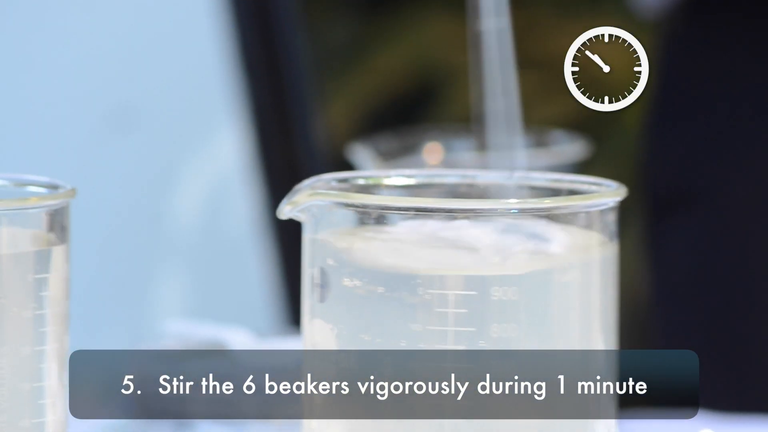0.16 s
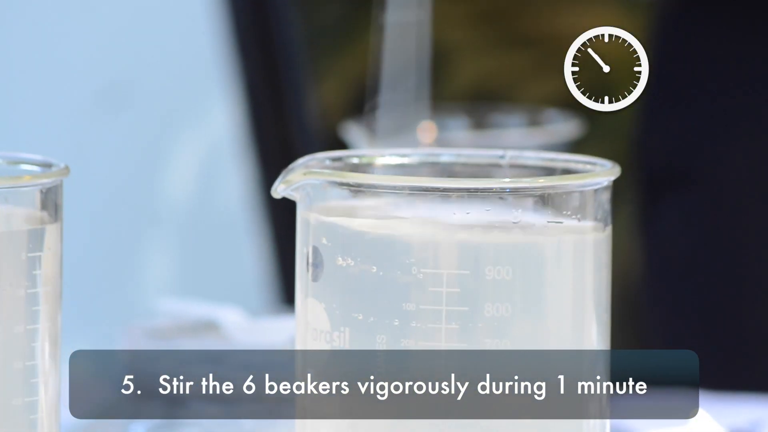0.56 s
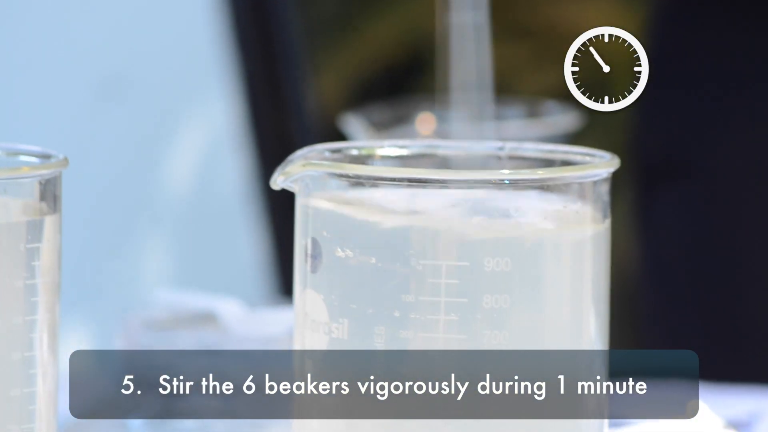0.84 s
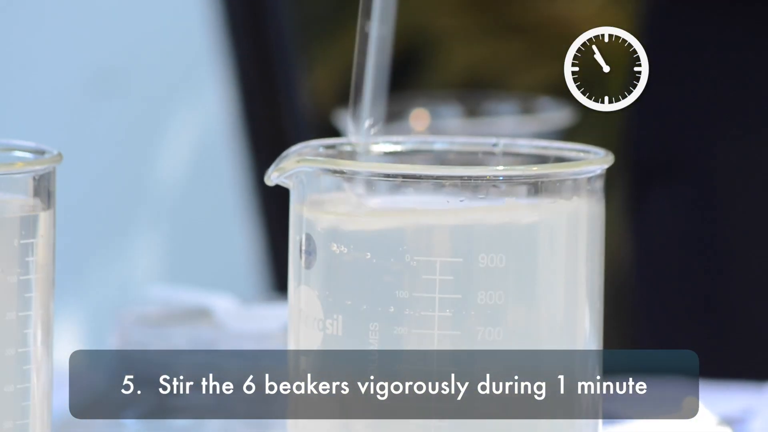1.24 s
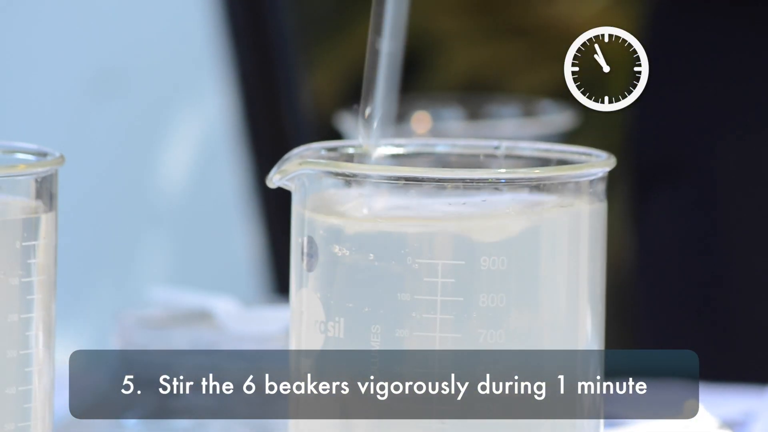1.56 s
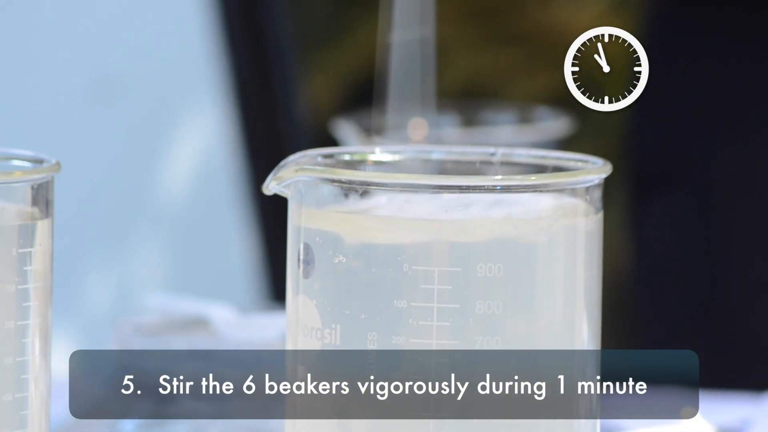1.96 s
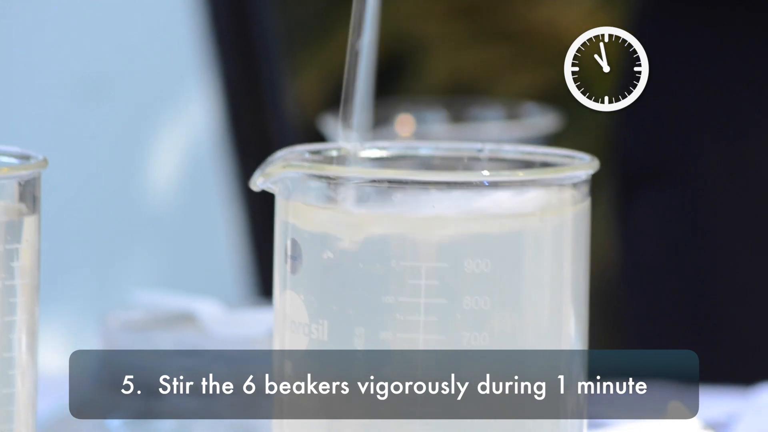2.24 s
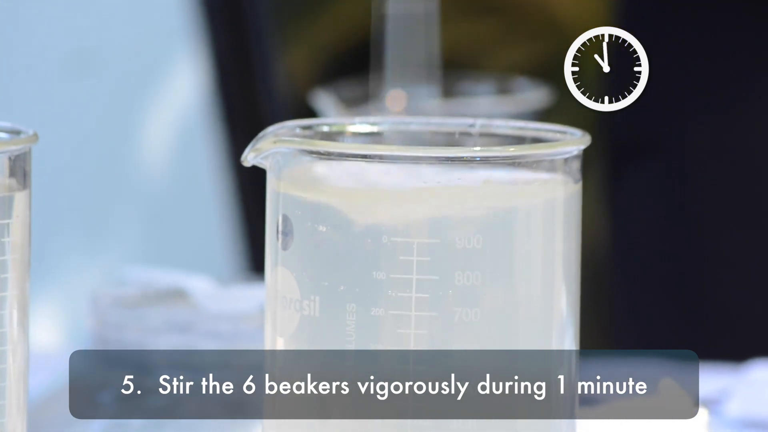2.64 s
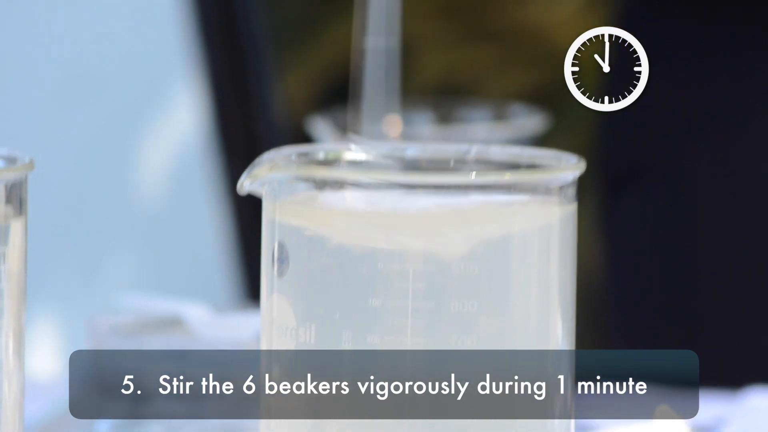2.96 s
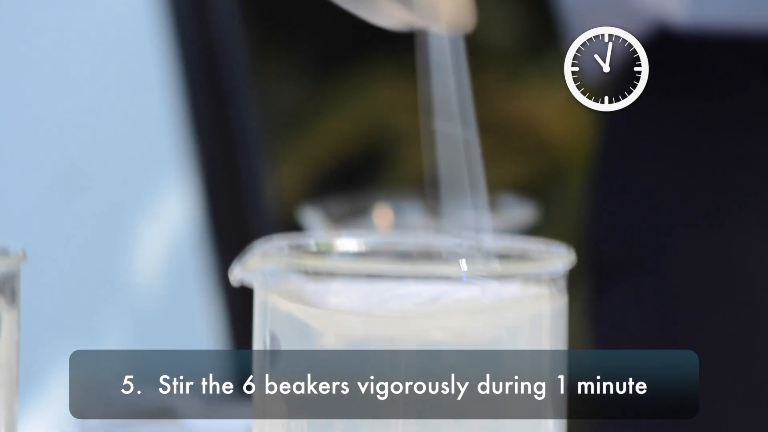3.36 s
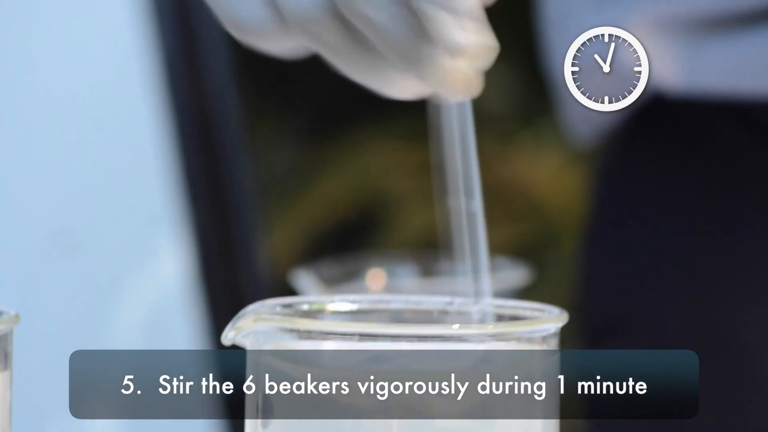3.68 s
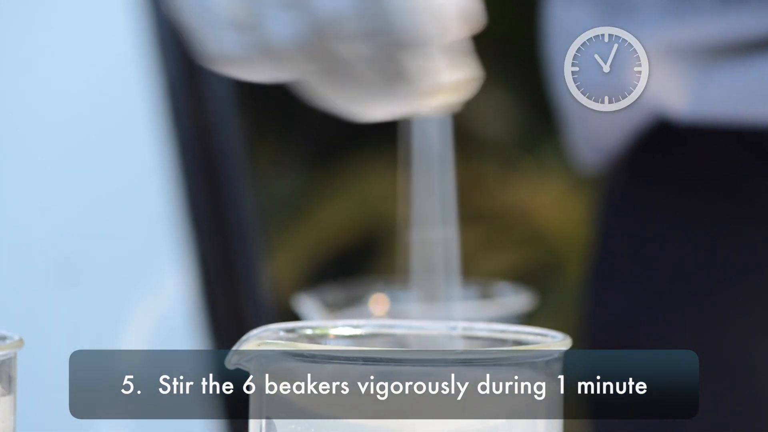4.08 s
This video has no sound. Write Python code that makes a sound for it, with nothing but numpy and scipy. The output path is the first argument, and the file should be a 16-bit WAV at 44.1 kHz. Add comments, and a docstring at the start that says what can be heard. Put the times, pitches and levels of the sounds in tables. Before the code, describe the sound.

Close, bright glass taps with quick bounces and small bubble plips, over echoing birdsong and a soft outdoor wash.

```python
"""A glass rod swings in a water-filled beaker outdoors: noisy cracks and ringing modes as it strikes and bounces.
The beaker wall sings on as a wavering tone, and bubbles pop as damped, rising tones.
Songbirds whistle gliding sine notes that echo among trees and walls.
A filtered-noise outdoor wash lies behind; a faint breeze makes low noise lumps and thuds on the microphones."""
import sys
import numpy as np
from scipy import signal
from scipy.fft import rfft, irfft
from scipy.io import wavfile
from scipy.ndimage import uniform_filter1d

SR = 44100
rng = np.random.default_rng(int(sys.argv[2]) if len(sys.argv) > 2 else 0)


def invert_db(x):
    """Field ratio 10**(x/20) for x, a level in decibels (scalar or array-like)."""
    u = np.asarray(x, float) / 20
    return 10 ** u


def dump(signal):
    """Clip the signal to [-1, 1] and save it as 16-bit WAV at the path in sys.argv[1]."""
    limited = np.clip(np.atleast_2d(signal).T, -1, 1)
    pcm = np.round(limited * 32767).astype(np.int16)
    wavfile.write(sys.argv[1], SR, pcm)


N = 185793  # samples in the scene


def evened(x):
    """Scales x to rms 1."""
    return x / np.sqrt(np.mean(x ** 2) + 1e-20)


def read(points, hz):
    """Reads a table on a log-frequency axis."""
    f, value = np.transpose(points)
    return np.interp(np.log(hz + 1), np.log(f + 1), value)


def add(mix, s, sound):
    """Mixes a sound in at s seconds."""
    part = mix[round(s * SR):][:len(sound)]
    part += sound[:len(part)]


def coloured(x, db_at):
    """Filters x by a gain in dB that depends on frequency."""
    gain = invert_db(db_at(np.fft.rfftfreq(x.shape[-1], 1 / SR)))
    return irfft(rfft(x) * gain, x.shape[-1])


def swells(rows, rest_db):
    """A resting level with smooth rises and falls laid over it."""
    t = np.arange(N) / SR
    level = invert_db(rest_db)
    for s, length, db in rows:
        level = level + invert_db(db) * np.sin(np.pi * np.clip((t - s) / length, 0, 1))
    return level


def echo(x, decay, first_s, same):
    """Dense two-channel scatter that fades in after first_s, each band dying at its own speed."""
    taps = rng.standard_normal((2, SR))
    taps[1] = same * taps[0] + np.sqrt(1 - same ** 2) * taps[1]  # same: left-right likeness
    hz, t, z = signal.stft(taps, SR, nperseg=256)
    z = z * invert_db(-60 * t / read(decay, hz)[:, None])
    tail = signal.istft(z, SR, nperseg=256)[1][:, :SR]
    tail *= np.clip(np.arange(SR) / SR / first_s - 1, 0, 1)
    tail /= np.linalg.norm(tail[0])
    return signal.fftconvolve(x[None], tail, axes=1)[:, :N]


def whistle(t, glide, level, waver=0.006, flutter_db=2.0):
    """A near-pure tone on the pitch curve glide, trembling slightly in pitch and strength."""
    tremble, flutter = (evened(uniform_filter1d(row, 300)) for row in rng.standard_normal((2, len(t))))
    glide = uniform_filter1d(glide, 150, mode="nearest") * (1 + waver * tremble)
    tone = np.sin(2 * np.pi * np.cumsum(glide) / SR)
    return t[0], np.sqrt(2) * level * invert_db(flutter_db * flutter) * tone


def note(start, length, db, first_hz, halfway_hz, last_hz):
    """A short whistle: pitch on a parabola through three points; the level rises, holds and falls."""
    rise, fall = 0.16, 0.34  # shares of the note
    t = np.arange(start, start + length, 1 / SR)
    u = (t - start) / length
    bend = 2 * (2 * halfway_hz - first_hz - last_hz) * u * (1 - u)
    glide = first_hz + (last_hz - first_hz) * u + bend
    edges = np.clip(np.minimum(u / rise, (1 - u) / fall), 0, 1)
    return whistle(t, glide, invert_db(db) * edges)


def wall_hum():
    """The beaker wall sings on in the swirl: a narrow tone whose strength wavers."""
    # swells of the singing: (start t/s, length/s, level/dB before the waver)
    singing = [(0, 0.36, -60), (1.0, 0.5, -60.5), (1.46, 0.37, -48.5), (1.93, 0.17, -46), (2.1, 0.28, -56),
               (2.92, .3, -51.5), (3.58, 0.093, -39)]
    sing_hz, width_hz, steady, rest_db = 1295, 14, 1.0, -63
    t, r = np.arange(N) / SR, np.exp(-np.pi * width_hz / SR)
    noise = rng.standard_normal(N) + 1j * rng.standard_normal(N)
    waver = signal.lfilter([1], [1, -r], noise)
    waver = steady + waver / np.sqrt(np.mean(abs(waver) ** 2))
    return swells(singing, rest_db) * (waver * np.exp(2j * np.pi * sing_hz * t)).real


def air():
    """The distant wash and its faint far tones: random short-time spectra with drifting patches."""
    # colour of the wash: (f/Hz, relative level/dB per Hz)
    wash = [(20, -26), (40, -10), (62, -11), (90, -8), (160, -20), (260, -12), (400, -2.5), (650, -0.5),
            (1000, -2.5), (2000, 1.5), (4500, -9.5), (9000, -15.5), (16000, -35)]
    # likeness of the two channels: (f/Hz, left-right likeness)
    likeness = [(60, 0.27), (300, 0.41), (1000, 0.43), (3000, 0.96), (8000, 0.89)]
    # faint far tones: (f/Hz, half width/Hz, relative level/dB ahead of drones_db)
    drones = [(320, 16, -3), (497, 18, 3), (1255, 12, 4), (1500, 16, -2)]
    level_db, patchy_db, drones_db = -53, 4.0, 3.5
    frames, hz = N // 1024 + 5, np.fft.rfftfreq(4096, 1 / SR)
    a, b, c, d, patches = rng.standard_normal((frames, 2049, 5)).T
    patches = evened(uniform_filter1d(uniform_filter1d(patches, 12, 0), 5, 1))
    same = np.clip(read(likeness, hz), -1, 1)[:, None]
    left = a + 1j * b
    right = same * left + np.sqrt(1 - same ** 2) * (c + 1j * d)
    colour = invert_db(read(wash, hz))
    for f, width, db in drones:
        colour = colour + invert_db(db + drones_db) * np.exp(-((hz - f) / width) ** 2)
    z = np.array([left, right]) * colour[:, None] * invert_db(patchy_db * patches)
    return invert_db(level_db) * evened(signal.istft(z, nperseg=4096, noverlap=3072)[1][:, :N])


def breeze():
    """Low lumps of turbulence, partly unlike at the two microphone ports."""
    # gusts over the microphones: (start t/s, length/s, level/dB)
    gusts = [(.38, 0.29, -66), (1.52, 0.24, -73), (1.74, 0.55, -64), (2.4, 0.46, -66.5), (3.2, 0.58, -61.5),
             (3.75, 0.21, -65.5), (3.96, 0.18, -61)]
    rumble = [(5, -8), (20, 4.0), (40, -8.0), (65, 9.5), (85, -44), (150, -27)]  # (f/Hz, gain/dB)
    noise = rng.standard_normal((2, N))
    noise[1] += 0.88 * noise[0]
    lumps = coloured(noise, lambda hz: read(rumble, hz))
    return evened(lumps) * swells(gusts, -83)


def strike(db, bass_db, low_db, top_db, middle_db):
    """The rod chatters on the wall for a few ms; the glass rings on, each mode struck a little differently."""
    # modes of table, beaker wall and rod: (f/Hz before detuning, t60/s)
    modes = [(190, .3), (322, .4), (497, .4), (945, .07), (1148, .07), (1298, .14), (1500, .03),
             (1880, .04), (2135, .05), (2490, .08), (2775, .09), (3070, .04), (3740, .07), (3880, .03),
             (4645, .105), (4780, .025), (5440, .02), (6245, .035), (6960, .025), (7900, .035),
             (8560, .025), (9030, .03), (9690, .02), (10300, .018), (10780, .025), (11340, .015),
             (12280, .018), (13370, .02), (13730, .016), (15400, .015)]
    # strength of the same modes: (level/dB before the random spread)
    modes_db = [-31.5, -29.5, -27, 7, 11.5, 7, -31, 10.5, -0.5, -8, 9.5, 8, -8, -41, 5, 9.5, -2, 3.5, -0.5,
                5.5, 4.5, -10, -1.5, 2.5, 5.5, 3.5, 8, 11, 10.5, 0]
    # colour of the unpitched crack: (f/Hz, gain/dB)
    crack_colour = [(850, -49), (1100, 21), (1800, 16.5), (3500, 21), (5500, 9.5), (7500, 15.5), (9700, 12),
                    (10300, 15.5), (12000, 9), (14500, 1), (15600, 1), (16500, -28)]
    rise_s, chatter_s, rattle_s = 0.00164, 0.0068, 0.051
    driven, spread_db = 0.77, 3
    t = np.arange(16384) / SR
    contact = np.clip(t / rise_s, 0, 1) ** 2 * np.exp(-(t / chatter_s) ** 3)
    swell = np.cumsum(contact) / contact.sum()  # modes build up while the contact lasts

    # tiny uneven after-contacts rattle on after the crack
    grain_db = 4 * evened(uniform_filter1d(rng.standard_normal(len(t)), 90))
    rattle = invert_db(-5.5 - 60 * t / rattle_s + grain_db) * swell
    noise = rng.standard_normal(len(t))
    crack = coloured(noise * (contact + rattle), lambda hz: read(crack_colour, hz))

    ring = np.zeros(len(t))
    for (hz, t60), mode_db in zip(modes, modes_db):
        # each strike detunes the modes a little at random, high ones most
        detune = 1 + .0015 * (1 + hz / 2500) * rng.standard_normal()
        decay_db = -60 * np.maximum(t - chatter_s / 2, 0) / t60
        strength = invert_db(mode_db + spread_db * rng.standard_normal() + decay_db)
        drive = swell ** .5 + driven * contact * (hz > 800)
        ring += strength * drive * np.sin(2 * np.pi * (hz * detune * t + rng.random()))

    thump_db = db + bass_db + 18.5  # only hard, deep blows shake the table
    # colour of the landing spot: (f/Hz, gain/dB)
    spot = [(250, thump_db), (300, 0), (560, 0), (620, -25), (860, bass_db - 12), (930, bass_db),
            (1350, bass_db), (1450, low_db), (2200, low_db), (2400, middle_db), (4900, middle_db),
            (5300, 0), (9200, 0), (11000, top_db)]
    both = coloured(np.array([crack, ring]), lambda hz: read(spot, hz))
    return invert_db(db - 19) * both * np.clip(t / 0.00051, 0, 1)


def arch():
    """The nearest bird's long arching note, a steadier whistle."""
    # pitch and level along the note: (t/s, f/Hz, level/dB)
    arch_curve = [(.02, 3450, -75), (.06, 3580, -39.5), (0.101, 3730, -46), (.2, 3923, -43),
                  (.3, 4070, -47.5), (0.421, 4142, -40), (0.524, 4129, -37.5), (.6, 4072, -47),
                  (0.631, 3920, -52)]
    s, hz, db = np.transpose(arch_curve)
    t = np.arange(s[0], s[-1], 1 / SR)
    return whistle(t, np.interp(t, s, hz), invert_db(np.interp(t, s, db)), waver=0.00041, flutter_db=1.0)


def slur(rows, ends_db, sets_in_s=0, swing_hz=0):
    """A longer whistle that moves evenly in dB between three levels; a warble may set in and widen."""
    rise_s, fall_s, warble_grows_s, trill_hz = 0.023, 0.039, 0.0686, 48
    s, hz = np.transpose(rows)
    t = np.arange(s[0], s[-1], 1 / SR)
    growth = np.clip((t - sets_in_s) / warble_grows_s, 0, 1)
    swing = swing_hz * growth * np.sin(2 * np.pi * trill_hz * t)
    edges = np.clip(np.minimum((t - s[0]) / rise_s, (s[-1] - t) / fall_s), 0, 1)
    db = np.interp(t, [s[0], (s[0] + s[-1]) / 2, s[-1]], ends_db)
    return whistle(t, np.interp(t, s, hz) + swing, invert_db(db) * edges)


def birdsong():
    """Notes, slurs, warbles and the nearest bird, direct and echoing among trees and walls."""
    # short notes: (start t/s, length/s, level/dB, first f/Hz, halfway f/Hz, last f/Hz)
    notes = [(0, .13, -54.5, 2350, 2170, 2290), (.06, 0.12, -57, 1780, 1790, 1806),
             (.07, 0.046, -53, 5000, 4620, 4000), (.495, 0.091, -45, 3020, 2760, 2785),
             (.708, 0.069, -44.5, 1700, 2390, 1405), (.895, .03, -49, 1800, 2455, 2600),
             (.92, .04, -42, 2563, 2247, 2050), (.96, 0.058, -41.5, 2520, 2790, 2810),
             (1.11, 0.092, -45, 2830, 3100, 3670), (1.392, 0.065, -44.5, 1907, 2200, 2870),
             (1.47, 0.11, -44, 3100, 2520, 2330), (1.575, 0.036, -51, 3540, 4070, 4900),
             (1.62, 0.078, -47, 3400, 2880, 2720), (1.72, 0.18, -54, 1460, 1630, 1601),
             (1.895, 0.047, -42.5, 1616, 2070, 2140), (2.328, 0.039, -45, 2980, 3325, 3130),
             (2.498, 0.064, -40, 4100, 3420, 2590), (2.558, .045, -36.5, 3100, 3420, 3490),
             (2.6, 0.124, -70, 3550, 3460, 3450), (2.63, 0.043, -58.5, 5900, 5600, 5400),
             (2.71, 0.071, -53.5, 4850, 4500, 4000), (3.27, 0.085, -46, 1922, 2340, 2750),
             (3.46, 0.025, -44.5, 2800, 3200, 4200), (4.08, 0.033, -52.5, 3500, 3900, 4830),
             (4.17, 0.026, -54, 5100, 4900, 4270), (3.82, 0.43, -57.5, 1463, 1525, 1460)]
    # pitch of the longer slurred whistles, one table each: (t/s, f/Hz)
    slurs = [
        [(.36, 2670), (.41, 3050), (.435, 3383), (.45, 3028), (.465, 2346), (.5, 2220)],
        [(.778, 1390), (.788, 1778), (.82, 2017), (.87, 1783), (.9, 1590)],
        [(1.16, 2578), (1.22, 3042), (1.275, 3122), (1.3, 2600), (1.33, 2004), (1.38, 1680), (1.41, 1776),
         (1.44, 2590)],
        [(2.99, 3010), (3.05, 2619), (3.1, 2340), (3.15, 2103), (3.21, 1540)],
        [(3.482, 3257), (3.5, 3528), (3.525, 3582), (3.54, 3000), (3.56, 2423), (3.585, 2020)],
        [(3.8, 2320), (3.85, 2528), (3.9, 2880), (3.97, 2919), (4.03, 2756), (4.11, 2185), (4.16, 2056),
         (4.21, 2495)],
    ]
    # level of each slur: (first level/dB, halfway level/dB, last level/dB)
    slurs_db = [(-48.5, -41.5, -46.5), (-51, -43.5, -48), (-41.5, -41.5, -63), (-36, -43, -47),
                (-32, -40.5, -26.5), (-37, -44.5, -44)]
    # centre pitch of the warbled whistles, one table each: (t/s, f/Hz)
    trills = [
        [(2.04, 2100), (2.085, 2750), (2.125, 2813), (2.15, 3126), (2.18, 3197), (2.23, 2900), (2.295, 2450),
         (2.33, 2905), (2.42, 2957)],
        [(2.64, 1773), (2.665, 1940), (2.705, 2500), (2.74, 2317), (2.92, 2340)],
        [(3.61, 2842), (3.64, 2878), (3.67, 2686), (3.78, 2660)],
    ]
    # level of each warbled whistle: (first level/dB, halfway level/dB, last level/dB)
    trills_db = [(-36.5, -43.5, -48), (-41.5, -39.5, -53), (-32, -43.5, -59)]
    # warble of each: (sets in at t/s, full swing/Hz either side)
    warbles = [(2.26, 390), (2.688, 283), (3.599, 323)]
    # echo around the birds: (f/Hz, t60/s)
    grove = [(1200, 0.69), (2500, 0.95), (4500, 0.62)]
    birds, nearest = np.zeros((2, N))
    for row in notes:
        add(birds, *note(*row))
    for rows, ends_db in zip(slurs, slurs_db):
        add(birds, *slur(rows, ends_db))
    for rows, ends_db, warble in zip(trills, trills_db, warbles):
        add(birds, *slur(rows, ends_db, *warble))
    add(nearest, *arch())
    wet = echo(birds + invert_db(-6) * nearest, grove, 0.0017, same=0.34)
    return birds + nearest + invert_db(2) * wet


def thuds():
    """Each sudden push of air is a slow, soft pulse on both ports."""
    # pushes: (t/s, level/dB ahead of the left-right offset)
    pushes = [(.37, -53), (.72, -68), (2.42, -57), (3.449, -52)]
    thud_hz, thud_s = 26.2, 0.086
    t, out = np.arange(0, thud_s, 1 / SR), np.zeros(N)
    pulse = np.sin(np.pi * t / thud_s) ** 2 * np.sin(2 * np.pi * thud_hz * t)
    for s, db in pushes:
        add(out, s, invert_db(db) * pulse)
    return out * invert_db([[2], [-2]])  # left 2 dB up, right 2 dB down


def bubble(db, hz, t60):
    """A damped tone that rises as the bubble nears the surface."""
    t = np.arange(6000) / SR
    climb = .5
    # a slight random wobble in phase
    wobble = 1.2 * evened(uniform_filter1d(rng.standard_normal(6000), 500))
    tone = np.sin(2 * np.pi * hz * (t + climb * t ** 2) + wobble)
    return invert_db(db - 60 * t / t60) * tone * np.clip(t / 0.0092, 0, 1)


def beaker():
    """Strikes, bounces and bubbles, with centred scatter and a faint left-right difference."""
    # strikes and bounces, coloured by where the rod lands:
    # (t/s, strength/dB, bass/dB, low/dB, top/dB)
    hits = [(.0014, -19.5, -2, -10, -5.5), (.0267, -25, -35, -20, -1), (.152, -20, -21, -8.5, -2.5),
            (.171, -22.5, -16, -14, -6), (0.3215, -29, -16.5, -19, -6), (0.3559, -25.5, -25, -16, -8),
            (0.9652, -23, -42, -8.5, -2), (0.9811, -25.5, -46, -17, -7), (1.1325, -15.5, -58, -11.5, -5.5),
            (1.1555, -20.5, -39, 0, -6.5), (1.2865, -28.5, -26, -7.5, -9), (1.2966, -35, -30, -20, -10),
            (1.4634, -15, -18, 0, -6.5), (1.483, -22, -30, -6, -4.5), (1.613, -14.5, -37, -14.5, -2),
            (1.6384, -20.5, -28, -10, -4), (1.758, -36.5, -43, -6, -11), (1.9473, -13, -32, -8, -7.5),
            (1.9754, -18.5, -25.5, -16, -7.5), (1.9916, -34, -18, -30, -5), (2.271, -23, -26, -29, -11),
            (2.2928, -36, -31, -34, -9), (2.584, -25, -13, -7, -10.5), (2.9357, -12.5, -30.5, -11.5, 0),
            (2.9852, -15.5, -30.5, -12, -9.5), (3.0194, -18.5, -29, -17, -12), (3.048, -29, -16, -4, -1),
            (3.264, -11.5, -5.5, 0.5, -2), (3.3147, -15, -36.5, -15, -5), (3.3499, -19.5, -48, -9, -9.5),
            (3.3836, -21.5, -14.5, -17, -1.5), (3.5874, -14.5, -16, -5, -5.5),
            (3.6191, -17.5, -10.5, -7, -5), (3.94, -13, -24.5, -3.5, -2), (3.9843, -20, -24, -7, -7.5),
            (4.094, -19.5, -31, -8.5, -5.5)]
    # bubbles, and at 3.246 s a soft ringing tick just before a strike:
    # (t/s, starting level/dB, starting f/Hz, t60/s)
    pops = [(0.433, -28, 1300, 0.037), (0.616, -31, 930, 0.026), (0.693, -39, 926, 0.033),
            (0.826, -42.5, 1025, 0.092), (2.599, -36.5, 1035, 0.12), (3.246, -30.5, 1165, 0.12),
            (3.389, -38, 938, 0.28), (3.388, -31, 1190, 0.063)]
    # scatter off table and neighbours: (f/Hz, t60/s)
    nearby = [(1000, 0.33), (2500, 0.19), (6000, 0.29), (10000, 0.21), (15000, 0.19)]
    # decay of the faint, brief left-right difference: (f/Hz, t60/s)
    side_decay = [(1000, 0.0053), (15000, 0.066)]
    strike_middle_db, bounce_middle_db, bounce_within_s = -3, -6, .07
    cracks, rings = np.zeros((2, N))
    gaps_s = np.diff([-1] + [row[0] for row in hits])
    for (s, *blow), gap_s in zip(hits, gaps_s):
        # bounces stir the middle modes less than full strikes
        middle_db = bounce_middle_db if gap_s < bounce_within_s else strike_middle_db
        crack, ring = strike(*blow, middle_db)
        add(cracks, s, crack)
        add(rings, s, ring)
    for s, *pop in pops:
        add(rings, s, bubble(*pop))
    # the crack feeds the centred scatter more strongly than the ring
    scatter = echo(invert_db(-5.0) * cracks + invert_db(-12) * rings, nearby, 0.002, same=1.0)
    # a faint, brief left-right difference around each sound
    unlike = invert_db(-24) * echo(cracks + rings, side_decay, .0005, same=0)
    return cracks + rings + scatter + unlike


def scene():
    """Near glass, far birds, wash and breeze."""
    return beaker() + birdsong() + wall_hum() + air() + breeze() + thuds()


def low_pass(x):
    """Removes everything above the highest recorded frequency."""
    return signal.sosfilt(signal.butter(12, 16690, fs=SR, output="sos"), x)


def record(dry):
    """Passes the finished mix on to its last stage."""
    return low_pass(dry)


dry = scene()
out = record(dry)
dump(out)
```